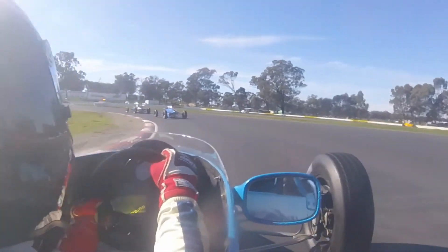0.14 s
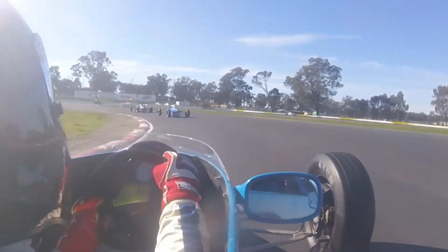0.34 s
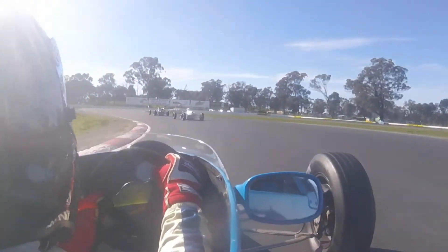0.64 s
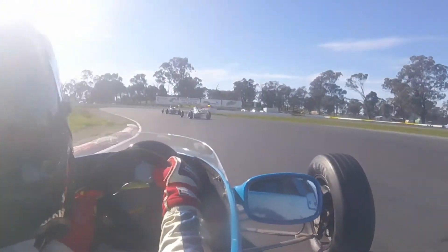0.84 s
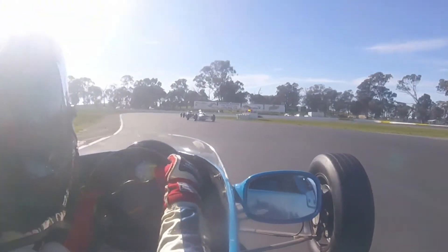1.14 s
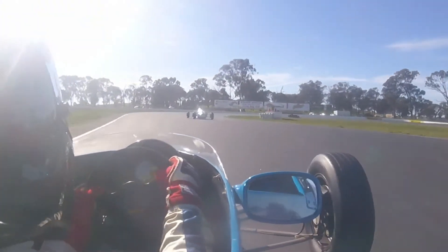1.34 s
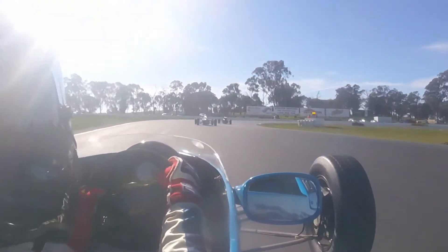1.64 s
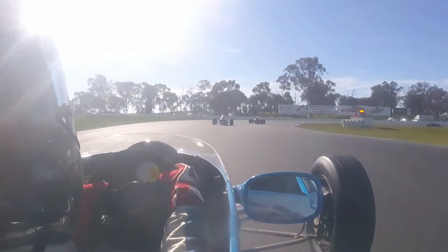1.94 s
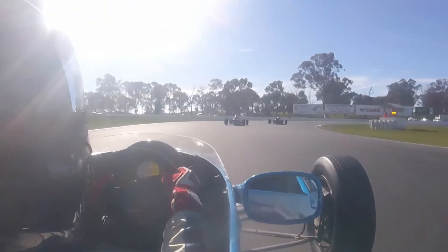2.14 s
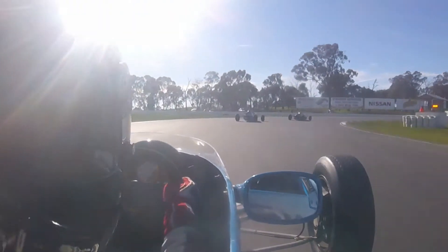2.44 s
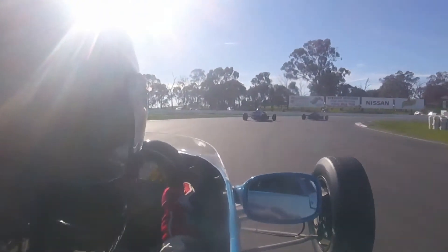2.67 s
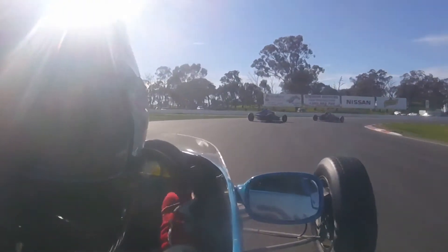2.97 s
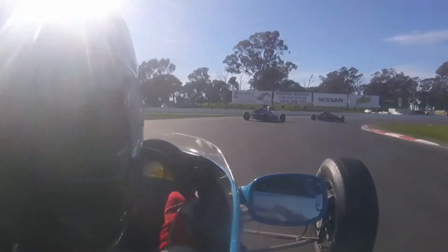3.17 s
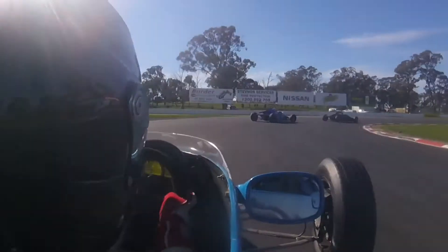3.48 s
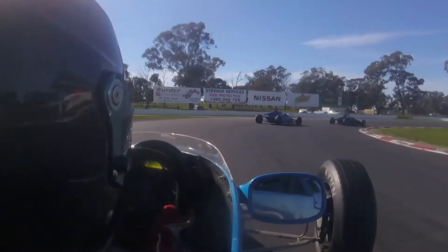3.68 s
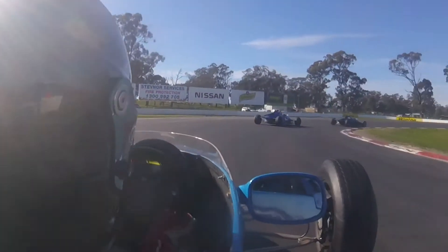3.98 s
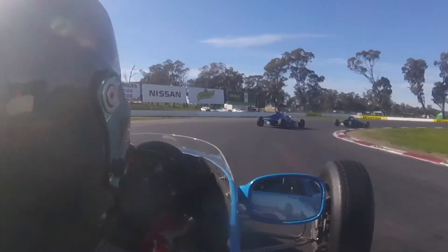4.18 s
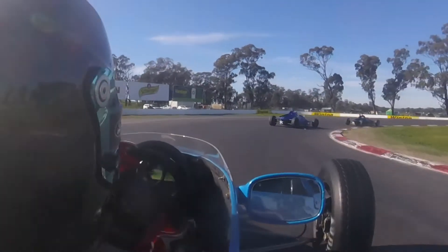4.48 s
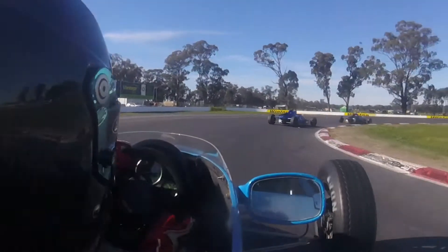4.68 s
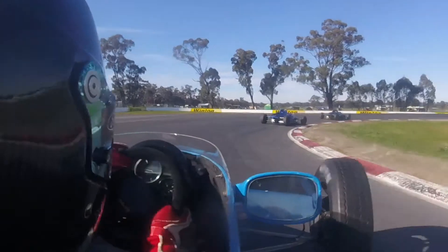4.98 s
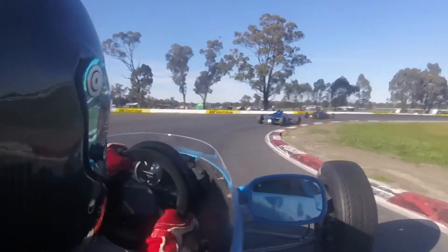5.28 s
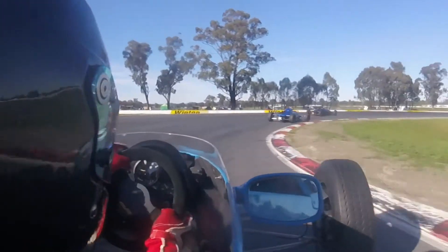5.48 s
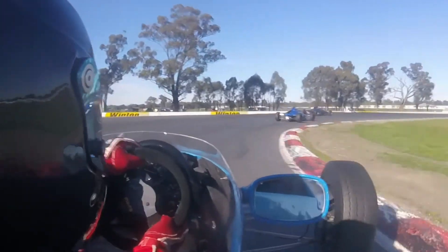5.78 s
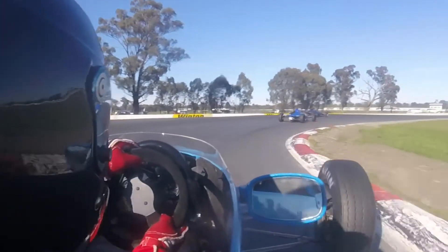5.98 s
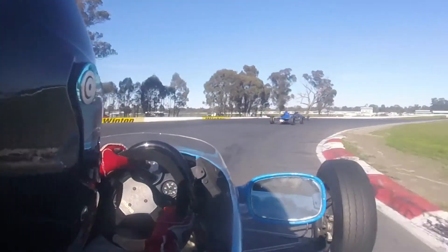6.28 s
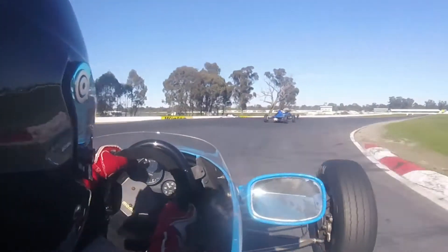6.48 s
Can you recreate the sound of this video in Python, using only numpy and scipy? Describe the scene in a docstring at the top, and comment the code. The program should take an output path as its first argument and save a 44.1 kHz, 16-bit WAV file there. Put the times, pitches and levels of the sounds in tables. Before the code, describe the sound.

Raspy engine drone with thin gear whine rises for two seconds, drops into a hollow overrun, then climbs again over rumble, hiss and knocks.

```python
"""A four-cylinder engine booms and rasps on board a small open-wheel race car; a gear whines with it.
The engine pulls, lifts off, rolls through a corner and pulls again. The boom, the whine and the puffs in
the roar all follow one crank angle. The tones swell where they cross resonances of the chassis or gear casing.
Shaped noise makes the road rumble, rasp, hiss, rattling surges and wind on the housed microphone.
Short pulses and bursts make the knocks, ticks and sizzles."""
import sys
import numpy as np
from scipy import signal
from scipy.fft import rfft, irfft, next_fast_len
from scipy.io import wavfile
from scipy.ndimage import uniform_filter1d, map_coordinates

SR = 44100
rng = np.random.default_rng(int(sys.argv[2]) if len(sys.argv) > 2 else 0)


def store_wav(level_fs):
    """Save 16-bit WAV to argv[1]."""
    pcm = np.round(np.clip(np.atleast_2d(level_fs), -1, 1) * 32767)
    wavfile.write(sys.argv[1], SR, pcm.T.astype(np.int16))


N = 291942  # length in samples


def amp(db):
    """Gain of a level in dB."""
    return 10 ** (np.asarray(db) / 20)


def unit(x):
    """x scaled to rms 1."""
    return x / np.sqrt(np.mean(x ** 2) + 1e-20)


def curves(rows):
    """Straight lines between the rows: one value per sample for each column after the time."""
    s, *columns = np.transpose(rows)
    return [np.interp(np.arange(N) / SR, s, column) for column in columns]


def wobble(rate):
    """A smooth random curve through random knots, rate of them a second."""
    coarse = np.arange(0, N + 32, 32)  # every 32nd sample is enough for a slow curve
    knots = rng.standard_normal(int(N * rate / SR) + 4)
    smooth = map_coordinates(knots, [coarse * rate / SR])
    return np.interp(np.arange(N), coarse, smooth)


def bumps(rows, length):
    """Sum of bell-shaped swells of one length in seconds, given as (middle in seconds, height)."""
    coarse = np.arange(0, N + 32, 32)
    total = sum(height * np.exp(-(2 * (coarse / SR - s) / length) ** 2) for s, height in rows)
    return np.interp(np.arange(N), coarse, total)


def filtered(x, response):
    """x with each frequency multiplied by response(frequency in Hz)."""
    m = next_fast_len(N + 8192)  # room for the filter to ring past the end
    return irfft(rfft(x, m) * response(np.fft.rfftfreq(m, 1 / SR)), m)[..., :N]


def noise(spectrum, patchy_db, gate=1):
    """Gated noise of rms 1, coloured by the spectrum, with random louder and softer patches."""
    z = signal.stft(gate * rng.standard_normal(N), nperseg=512)[2]
    field = rng.standard_normal(z.shape)
    field = uniform_filter1d(field, size=10, axis=0)  # smooth over frequency
    field = uniform_filter1d(field, size=4, axis=1)  # smooth over time
    patchy = signal.istft(z * amp(patchy_db * unit(field)), nperseg=512)[1][:N]
    f, db = np.transpose(spectrum)
    return unit(filtered(patchy, lambda hz: amp(np.interp(np.log(hz + 1), np.log(f + 1), db))))


def resonance_db(modes, hz):
    """Level in dB of a slowly gliding tone at hz that passes through a set of resonances."""
    step = 64  # samples between computed levels
    glide = hz[::step]
    power = sum(amp(2 * db) / (1 + (2 * (glide - centre) / width) ** 2) ** 2
                for centre, width, db in modes)
    return np.interp(np.arange(N), np.arange(0, N, step), 10 * np.log10(power))


def order(angle, times, db, waver_db, drift):
    """A tone locked to the crank; troughs line up in one suction pulse a turn, loosened by drift (radians)."""
    phase = times * angle + drift * (wobble(10) + 5 * wobble(1.476))
    if waver_db:
        db = db + waver_db * wobble(20)
    return -np.sqrt(2) * amp(db) * np.cos(phase)


def wind_buffet():
    """Wind buffets the housing: deep noise that grows and fades."""
    # Wind level. Each row: time in seconds, level in dB rms.
    buffet_level = [(0.03, -39.5), (2.0, -38), (2.05, -45), (3.64, -43.5), (5.5, -35), (5.56, -46.5),
                    (6.14, -46), (6.27, -36.5), (6.58, -43.5)]
    # Colour of the buffeting. Each row: frequency in Hz, relative level in dB per Hz.
    thud_colour = [(8, -62), (22, -14.5), (35, -3.5), (48, 0.5), (62, -9.5), (120, -120)]
    return amp(curves(buffet_level)[0]) * noise(thud_colour, patchy_db=1.5)


def road_rumble(jolt):
    """The road shakes the microphone: low noise whose level wavers and follows the jolts."""
    # Road level. Each row: time in seconds, level in dB rms before the wavering.
    road_level = [(0, -22), (1.0, -22), (1.4, -21), (1.9, -23.5), (2.5, -23.5), (2.9, -22.5), (3.2, -25),
                  (3.9, -24.5), (4.15, -18), (4.5, -19), (4.7, -20), (5.0, -17.5), (5.5, -17.5),
                  (5.7, -19.5), (6.05, -25.5), (6.35, -23), (6.62, -23)]
    # Colour of the rumble. Each row: frequency in Hz, relative level in dB per Hz.
    rumble_colour = [(30, -71.5), (50, -10.5), (85, -5), (140, -6), (190, 2), (240, -2.5), (300, -7),
                     (400, -15.5), (700, -50), (1500, -120)]
    level_db = curves(road_level)[0] + 0.8 * wobble(7) + 0.55 * jolt
    return amp(level_db) * noise(rumble_colour, patchy_db=1.5)


def wind_and_intake_hiss(hiss_db, puffs, jolt):
    """Wind and intake hiss: bright noise that pulses with the crank and flickers."""
    # Colour of the hiss. Each row: frequency in Hz, relative level in dB per Hz.
    hiss_colour = [(500, -120), (1000, -4.5), (1500, -6.5), (2700, -11.5), (3400, -13), (3900, -17),
                   (4300, -16), (5300, -11), (6100, -17.5), (7000, -25), (8200, -33), (9500, -38.5),
                   (10500, -50), (12000, -91)]
    flicker = amp(0.66 * wobble(400))
    level_db = hiss_db + 0.39 * wobble(12) + 0.19 * jolt
    return amp(level_db) * noise(hiss_colour, patchy_db=0.74, gate=puffs * flicker)


def rattling_surges():
    """Brief surges of rattling noise, made lumpy by a fast random gain."""
    # The surges. Each row: middle in seconds, level there in dB rms.
    surge_rows = [(.05, -36), (.34, -36.5), (1.05, -36.5), (1.21, -38.5), (1.36, -38), (1.45, -37.5),
                  (2.03, -34), (3.62, -35), (4.0, -34.5), (4.33, -36.5), (4.97, -35), (5.14, -35.5)]
    # Colour of the rattle. Each row: frequency in Hz, relative level in dB per Hz.
    rattle_colour = [(500, -120), (900, -5), (1300, 2.5), (2200, -5.5), (3300, -13), (4500, -31),
                     (7000, -120)]
    swell = bumps([(s, amp(db)) for s, db in surge_rows], length=0.034)
    return swell * noise(rattle_colour, patchy_db=2.5, gate=amp(3 * wobble(300)))


def knocks():
    """The chassis knocks over bumps: one deep trough between two crests; lesser ones fall at random."""
    # Loudest knocks. Each row: time in seconds (one cycle before the trough), peak in dB, pitch in Hz.
    loud_knocks = [(0.487, -10, 502), (0.532, -7, 495), (0.59, -10.5, 510), (0.727, -11, 539),
                   (1.009, -8, 530), (1.049, -7.5, 506), (1.619, -11, 538), (2.726, -16.5, 670),
                   (4.327, -9.5, 711), (4.374, -13.5, 633), (4.569, -10, 448), (5.322, -8.5, 670),
                   (5.458, -9.5, 640), (5.583, -5.5, 603)]
    small_count, small_db, small_hz = 14, -17.5, 586  # count, middle peak level and middle pitch
    out, t = np.zeros(N + SR), np.arange(SR // 100) / SR
    small_knocks = [(0.01 + u * N / SR, small_db + 6 * (v - 0.5), small_hz * (1 + (w - 0.5)))
                    for u, v, w in rng.random((small_count, 3))]
    for s, db, hz in loud_knocks + small_knocks:
        cycles = hz * t - 1.5  # the trough is at zero
        pulse = np.exp(-(cycles / 0.5) ** 2) * np.cos(2 * np.pi * cycles)
        out[round((s - 0.5 / hz) * SR):][:len(t)] -= amp(db) * pulse
    return out[:N]


def ticks():
    """Grit and linkage tick on the housing: short noise cracks, each with a duller snap."""
    # Each row: time in seconds, crack level in dB, snap impulse level in dB, both before the filters.
    tick_rows = [(.119, -31, -25), (0.374, -35.5, -24.5), (2.356, -33.5, -18), (2.3705, -32.5, -18.5),
                 (2.378, -31.5, -2.5), (2.4256, -38, -22), (2.436, -35, -20), (4.369, -32.5, -22),
                 (4.782, -32, -23.5), (4.955, -44, -18.5), (5.088, -33, -19), (5.476, -29, -21.5),
                 (5.829, -31, -21), (5.906, -34.5, -24.5), (6.101, -30.5, -18.5)]
    cracks, snaps, t = np.zeros(N + SR), np.zeros(N), np.arange(SR // 40) / SR
    for s, db, snap_db in tick_rows:
        start = round(s * SR)
        fade = amp(-60 * t / 0.003)  # falls 60 dB in 3 ms
        crack = fade * (rng.standard_normal(len(t)) + 3 * (t == 0))
        cracks[start:][:len(t)] += amp(db) * crack
        snaps[start] = -amp(snap_db)
    cracks = filtered(cracks[:N], lambda hz: 1 / (1 + (hz / 8500) ** 10))
    return cracks + filtered(snaps, lambda hz: 1 / (1 + 1j * hz / 3500) ** 3)


def sizzles():
    """Brief bright sizzles: noise in a band around one frequency, swelling and fading."""
    # Each row: middle in seconds, length in seconds, level at the middle in dB rms, frequency in Hz.
    sizzle_rows = [(3.85, .05, -49, 6706), (4.383, .06, -55.5, 6696)]
    out, t = np.zeros(N), np.arange(N) / SR
    for s, length, db, centre_hz in sizzle_rows:
        band = unit(filtered(rng.standard_normal(N), lambda hz: np.exp(-((hz - centre_hz) / 1100) ** 2)))
        out += amp(db) * np.exp(-(2 * (t - s) / length) ** 4) * band
    return out


def exhaust_rasp(rasp_db, puffs, jolt):
    """The exhaust rasps: noise that puffs with the crank, made lumpy by loose parts."""
    # Colour of the rasp. Each row: frequency in Hz, relative level in dB per Hz.
    rasp_colour = [(100, -120), (200, -16.5), (400, -2), (500, 0), (650, -1), (760, -6), (1000, -8),
                   (1300, -14.5), (1600, -20), (2500, -23.5), (3800, -45), (7000, -120)]
    loose_parts = amp(1.3 * wobble(250))
    level_db = rasp_db - 2.0 + 0.8 * wobble(8) + 0.73 * jolt
    return amp(level_db) * noise(rasp_colour, patchy_db=0.0, gate=puffs * loose_parts)


def rush(angle, rasp_db, hiss_db):
    """All the noise together: rumble, rasp and hiss share jolts; rasp and hiss share puffs and a dip."""
    jolt = wobble(30)
    dip_db = bumps([(2.4, -4.5)], length=0.035)  # the roar dips briefly after the loudest tick
    puffs = 1 + 0.084 * np.cos(2 * angle) + 0.081 * np.cos(angle)
    sound = wind_buffet() + road_rumble(jolt) + rattling_surges()
    sound += wind_and_intake_hiss(hiss_db + dip_db, puffs, jolt)
    return sound + exhaust_rasp(rasp_db + dip_db, puffs, jolt)


def gear(speed_hz, angle):
    """An eighteen-tooth gear whines at its mesh rate and two overtones, loudest on a casing resonance."""
    # Gear tones. Each row: times a crank turn, dB added to the casing response.
    mesh_tones = [(18, 3), (36, 0.8), (54, -3)]
    # Whine level. Each row: time in seconds, dB added to the casing response.
    whine_level = [(0, -13), (1.0, -4.5), (2.255, 1.5), (2.29, -13), (3.4, -9.5), (3.6, 2.5), (4.7, -2.3),
                   (5.1, 0.5), (5.6, 0), (6.05, -4.5), (6.36, 2.5), (6.62, -4.5)]
    # Casing resonances. Each row: frequency in Hz, width in Hz, peak in dB before the two additions.
    casing_modes = [(1260, 45, -44), (1319, 50, -43), (1520, 54, -47.5), (2300, 60, -47.5),
                    (2515, 51, -46.5), (2670, 160, -47), (2920, 170, -49), (3180, 250, -55),
                    (3370, 100, -47), (4000, 200, -51.5), (4450, 150, -57)]
    whine_db, = curves(whine_level)
    sound = np.zeros(N)
    for times, db in mesh_tones:
        level_db = db + whine_db + resonance_db(casing_modes, times * speed_hz)
        sound += order(angle, times, level_db, waver_db=2.0, drift=0.3)
    return sound


def engine(boom_db, speed_hz, angle, shut, rasp_db):
    """Two firings a turn boom; other orders (tones at multiples of crank speed) cross resonances and swell."""
    # Spells in which the boom throbs over bumps. Each row: time of the middle crest in seconds,
    # length in seconds, throbs per second in Hz, depth from 0 to 1.
    throb_spells = [(0.408, 0.14, 15.5, 0.34), (0.598, .15, 11, 0.2), (1.466, .14, 22, 0.5),
                    (1.648, .14, 18, 0.28), (2.129, .12, 17, 0.5), (2.3, 0.22, 16, 0.6),
                    (2.436, 0.07, 8.6, 0.42), (2.715, 0.29, 13.7, 0.13), (5.409, 0.11, 6.4, 0.3)]
    # Orders through the chassis. Each row: times a turn, dB added with the throttle open,
    # dB added with it shut, dB of swell per dB of rasp.
    chassis_orders = [(1, -0.7, -2, -0.05), (3, -6.5, -5, 0.42), (4, -0.3, 0.1, 0.94), (6, 0.5, -1.5, 0.34),
                      (8, -4.5, -9.5, 0.6), (10, -1, 0.2, 0.35), (12, -0.8, -5.5, 0.45), (14, -3, -6, 0.7)]
    # Resonances with the throttle open, then shut. Each row: frequency in Hz, width in Hz,
    # peak in dB before the order's own additions.
    chassis_modes = [(69.6, 10, -23), (82, 3.4, -28.5), (90, 7, -26), (203.9, 28, -10), (248.4, 14, -18),
                     (278.9, 25, -18), (305.4, 28, -20), (357, 22, -25), (405, 27, -28.5), (481, 51, -27.5),
                     (561.8, 56, -26.5), (670, 110, -30), (743.5, 14, -28), (814, 53, -36),
                     (911, 94, -36.5), (1004, 98, -35.5), (1109, 31, -34.5)]
    overrun_modes = [(69.8, 6.9, -22), (92.5, 8, -30.5), (216, 50, -20.5), (333, 63, -24.5),
                     (408, 22, -29.5), (483, 30, -33), (670, 73, -34), (870, 140, -36), (1020, 120, -40)]
    # Weak upper orders. Each row: times a turn, level in dB rms before swelling and wavering.
    upper_orders = [(5, -39.5), (7, -37), (9, -40.5), (11, -46.5), (13, -49.5), (16, -48), (20, -58)]

    t = np.arange(N) / SR
    throb = np.ones(N)
    for s, length, hz, depth in throb_spells:
        throb += bumps([(s, depth)], length) * np.cos(2 * np.pi * hz * (t - s))
    sound = throb * order(angle, 2, boom_db, waver_db=0.74, drift=0.11)

    swell_db = rasp_db - rasp_db.mean()
    for times, open_db, shut_db, grows in chassis_orders:
        hz = times * speed_hz
        pulling_db = open_db + resonance_db(chassis_modes, hz)
        overrun_db = shut_db + resonance_db(overrun_modes, hz)
        level_db = (1 - shut) * pulling_db + shut * overrun_db
        level_db = level_db + grows * swell_db + 0.86 * wobble(5)
        sound += order(angle, times, level_db, waver_db=1.55, drift=0.13)

    effort_db = 1.6 * swell_db  # weak orders swell with the rasp
    for times, db in upper_orders:
        sound += order(angle, times, db + effort_db + wobble(4.1), waver_db=None, drift=0.23)
    return sound


def scene():
    """One crank angle, summed up from the engine speed, drives the engine, the gear and the puffs."""
    # Crank. Each row: time in seconds, turns per second in Hz, firing boom in dB rms before wavering.
    crank = [(0.0, 80.34, -12), (0.2, 81.5, -10), (0.4, 82, -10), (0.5, 82.87, -9), (0.8, 84.55, -8),
             (1.1, 85.2, -9), (1.3, 86.43, -8.5), (1.4, 85.2, -8.5), (1.6, 88.5, -7.5), (1.82, 90.7, -12.5),
             (1.92, 92.54, -11.5), (2.1, 93.57, -12.5), (2.28, 95.5, -10), (2.4, 87.5, -9),
             (2.5, 90.8, -13.5), (2.6, 87, -9.5), (2.9, 80.05, -11.5), (3.1, 75.1, -16),
             (3.25, 72.6, -29.5), (3.4, 68.65, -32), (3.52, 66.78, -25.5), (3.62, 66.63, -27),
             (3.75, 67.13, -21.5), (4.0, 67.72, -27), (4.18, 69.14, -35.5), (4.3, 69.5, -19.5),
             (4.42, 70.1, -20), (4.54, 64.3, -21), (4.8, 64, -16.5), (4.86, 68.23, -33.5),
             (5.0, 69.14, -19), (5.1, 71.95, -19), (5.2, 73, -13.5), (5.3, 73.84, -13.5),
             (5.5, 74.53, -11.7), (5.7, 75.7, -11), (5.9, 76.75, -9.5), (6.3, 80.6, -11), (6.62, 84, -9.5)]
    # Throttle. Each row: time in seconds, opening from 0 to 1.
    throttle = [(0, 0.8), (2.26, 0.97), (2.36, 0.5), (3.5, 0), (3.75, 0.5), (4.4, 0.3), (4.55, 1),
                (4.8, 0.6), (4.92, 0.83), (6.62, 0.97)]
    # Roar. Each row: time in seconds, exhaust rasp in dB, wind and intake hiss in dB,
    # both before the later level changes.
    roar = [(0.03, -29, -40.5), (0.45, -27, -38.5), (0.5, -25, -38), (0.63, -27.5, -37.5),
            (1.07, -25.5, -37.5), (1.14, -27.5, -39.5), (1.84, -26.5, -37.5), (1.89, -26, -37),
            (2.16, -24.5, -34), (2.53, -30, -39), (2.84, -28.5, -42.5), (3.29, -28.5, -43), (3.4, -28, -43),
            (4.37, -22, -35), (4.52, -24.5, -39.5), (5.08, -20.5, -32.5), (5.85, -23.5, -37.5),
            (6.0, -26, -39), (6.52, -25, -37), (6.58, -23, -36.5)]
    speed_hz, boom_db = curves(crank)
    shut = np.clip(1 - curves(throttle)[0], 0, 1)
    rasp_db, hiss_db = curves(roar)
    angle = 2 * np.pi * np.cumsum(speed_hz) / SR  # radians
    sound = rush(angle, rasp_db, hiss_db) + knocks() + ticks() + sizzles()
    sound += gear(speed_hz, angle) + engine(boom_db, speed_hz, angle, shut, rasp_db)
    return sound[None]  # one channel


def record(dry):
    """The input stage rounds off the highest peaks; nothing is kept above the band limit."""
    top_hz = 11200
    rounded = dry / (1 + np.abs(dry / 0.95) ** 6) ** (1 / 6)
    return filtered(rounded, lambda hz: (hz > 0) & (hz < top_hz))


dry = scene()
out = record(dry)
store_wav(out)
```